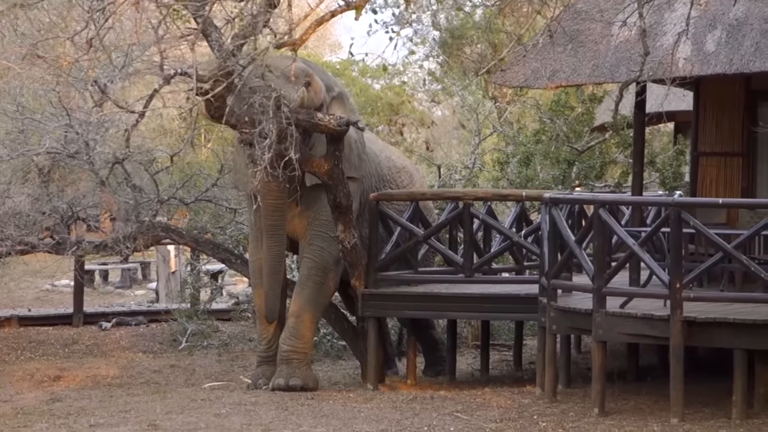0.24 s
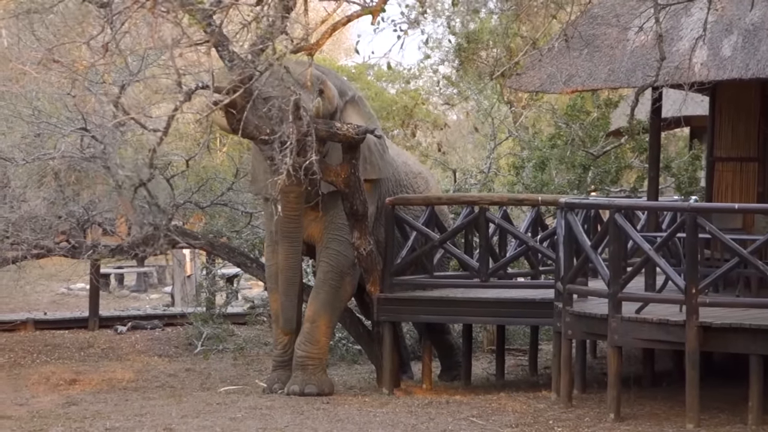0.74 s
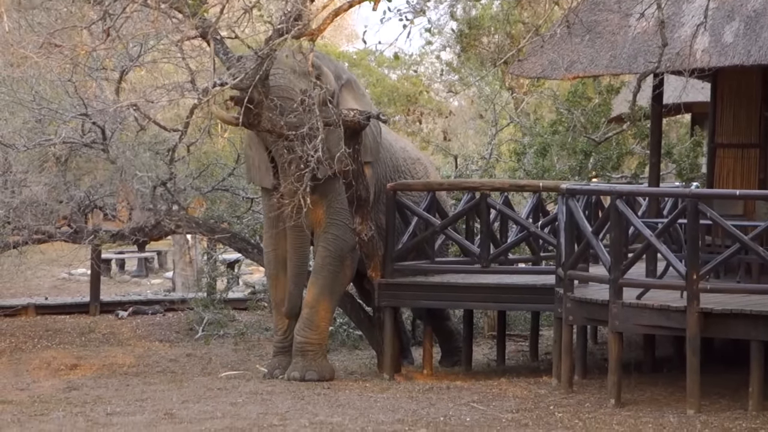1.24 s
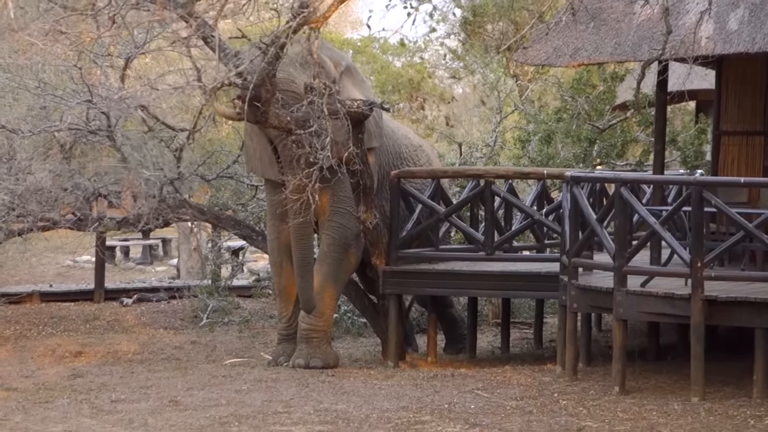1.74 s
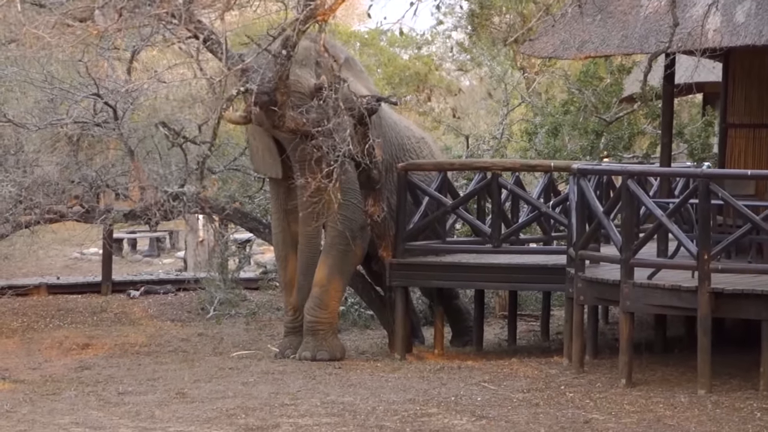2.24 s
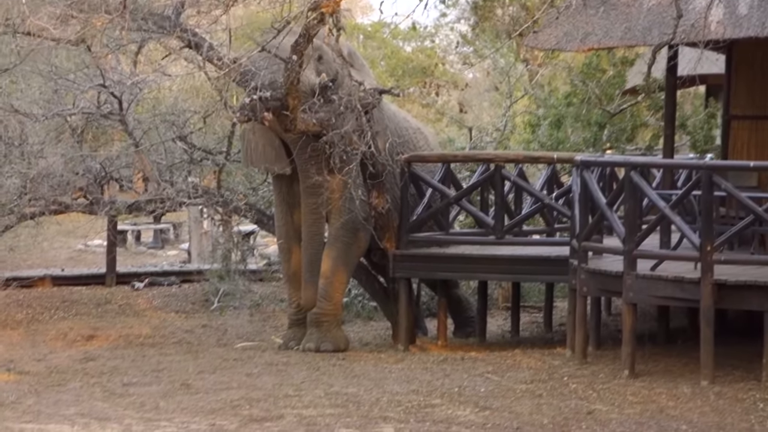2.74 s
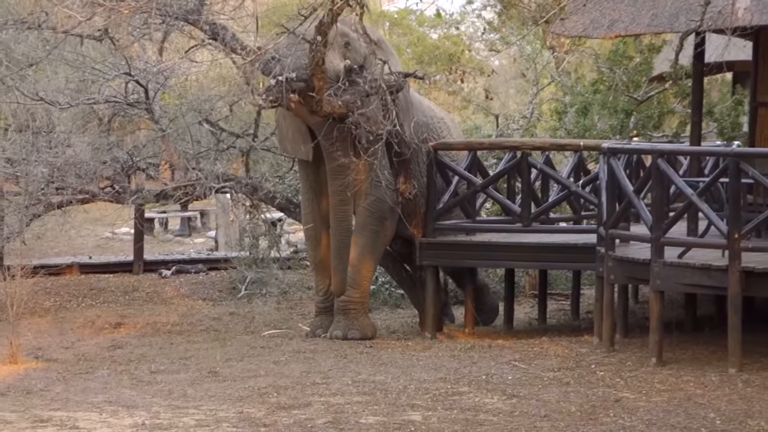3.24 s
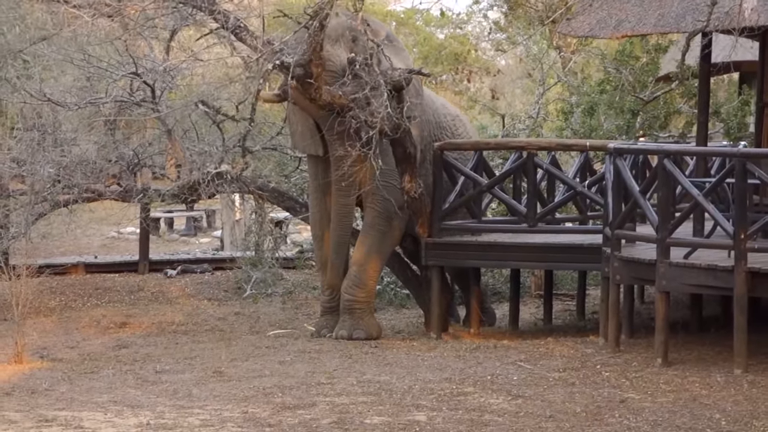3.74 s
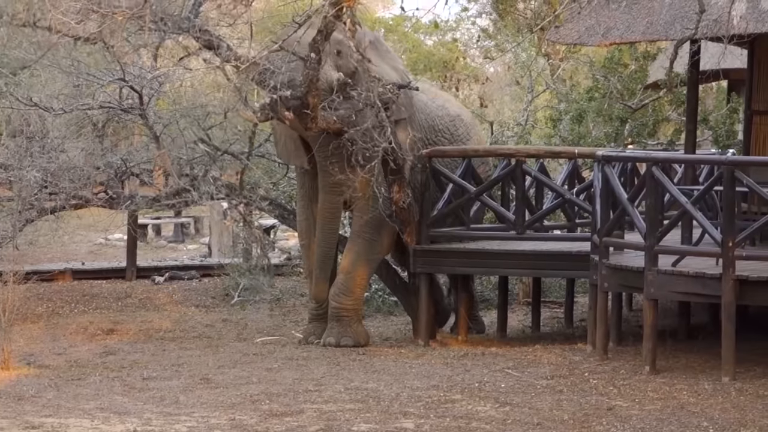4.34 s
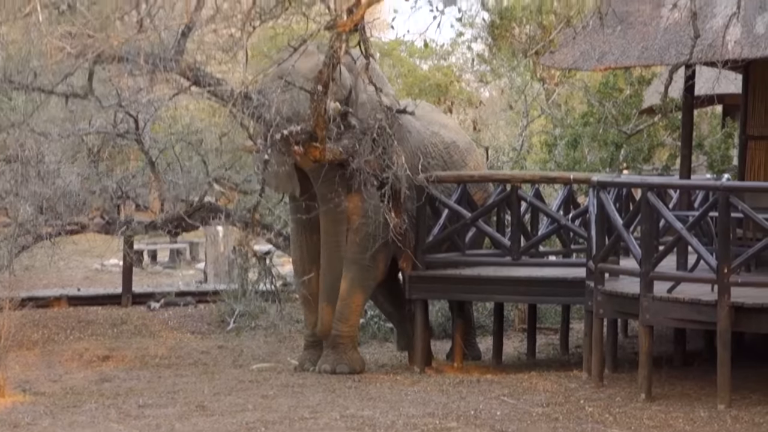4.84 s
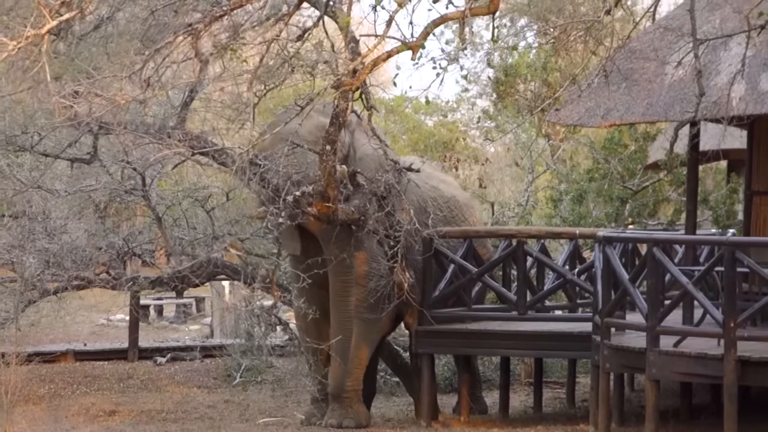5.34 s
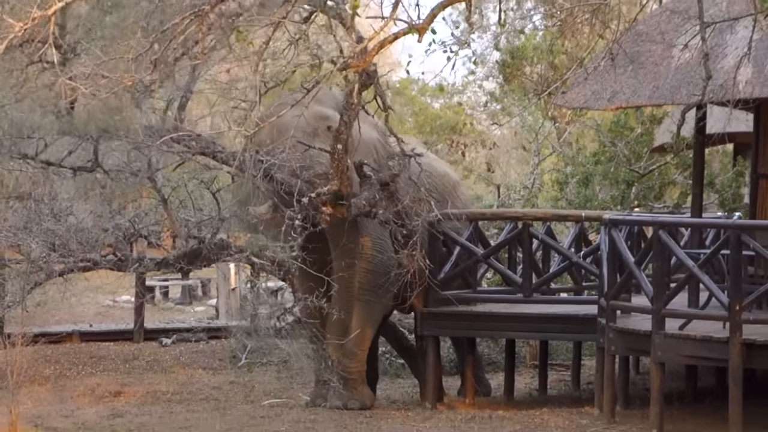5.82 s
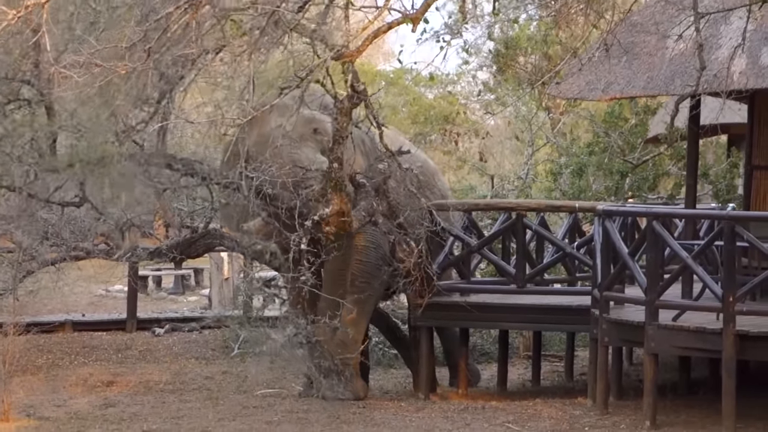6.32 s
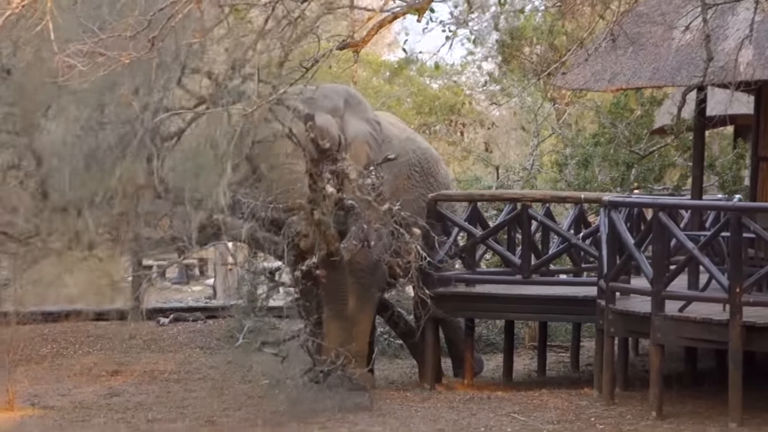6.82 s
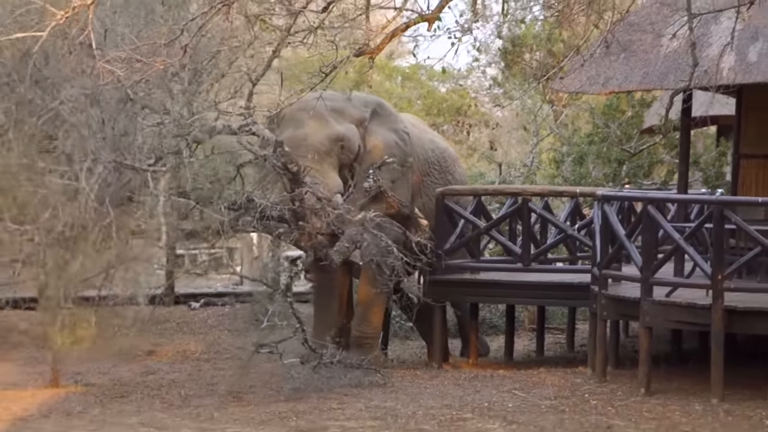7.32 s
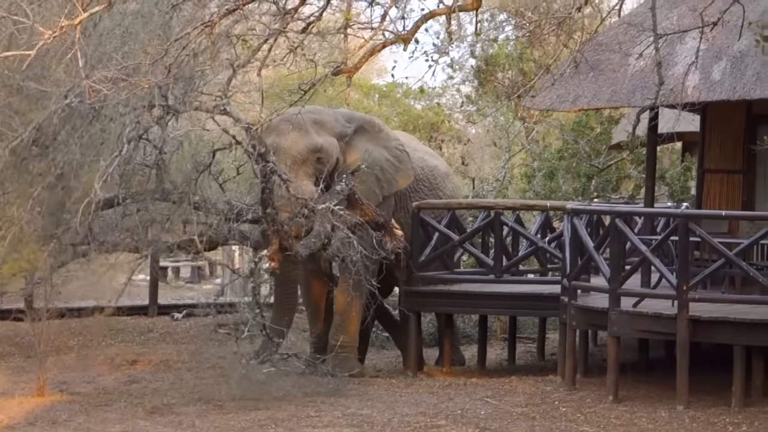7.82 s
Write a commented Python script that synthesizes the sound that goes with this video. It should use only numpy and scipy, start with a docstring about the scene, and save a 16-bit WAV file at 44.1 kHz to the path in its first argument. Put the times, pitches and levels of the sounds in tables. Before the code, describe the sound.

An elephant tears at a dry tree, branches cracking and splintering with sharp twig snaps and leafy rustling, while wind buffets the microphone.

```python
"""Open bush: an elephant pulls dry branches off a tree, heard through the two ports of a camera.
Limbs crack and splinter: ragged noise bursts, ringing wood modes and a scattered tail; twigs snap.
Twigs and leaves rustle as coloured noise and random ticks, and shiver after every crack.
Gusts buffet the ports as banded pulse trains, single eddies and hard knocks over a low breeze;
the left port lifts the treble of what comes through the air."""
import sys
import numpy as np
from scipy import signal
from scipy.fft import rfft, irfft, next_fast_len
from scipy.io import wavfile
from scipy.ndimage import uniform_filter1d

SR = 44100
rng = np.random.default_rng(int(sys.argv[2]) if len(sys.argv) > 2 else 0)


def write(x):
    x = np.atleast_2d(x).T
    wavfile.write(sys.argv[1], SR, np.round(np.clip(x, -1, 1) * 32767).astype(np.int16))

N = 356011
T = np.arange(N) / SR  # s

# Cracks of wood: t/s, level/dB, thickness/0-1, twig part against the level/dB
CRACKS = [(0.46, -45, 0.68, 10.5), (0.781, -42.5, .7, 5), (0.8122, -30, 0.84, 0), (0.8174, -19.5, 0.8, 2),
          (0.831, -30, 0.93, -5), (0.861, -25.5, 0.91, 4.5), (0.933, -15.5, 0.77, 3.5),
          (0.9622, -22, 0.5, 2), (0.973, -29.5, 0.96, 1), (1.2016, -32, 0.66, -9), (1.245, -37, 0.3, -16),
          (1.3238, -36.5, 0.57, -9), (1.374, -26.5, 0.8, 0), (1.4089, -27, 0.66, 6.5),
          (1.418, -30, 0.45, 2), (1.468, -41.5, 0.3, 13), (1.488, -34.5, 0.92, 0), (1.544, -42, 0.83, -10),
          (1.599, -36, 0.72, 5.5), (1.6388, -31, 0.81, 4.5), (1.776, -38, 0, 6), (1.84, -42, 0.04, 3),
          (1.86, -44, 0, 7), (2.0703, -35, 0.83, -21), (2.095, -25.5, 0.2, 8), (2.1057, -17.5, 0.81, -2),
          (2.259, -30, 0.26, 1), (2.2816, -17.5, 0.76, 2.5), (2.345, -40, 0.4, 15.5), (2.3669, -41, .1, 15),
          (2.447, -39, 0.34, 6.5), (2.468, -36.5, 0.55, -11), (2.5335, -29.5, 0.71, 6.5),
          (2.6276, -36, 0, 12), (2.702, -37, 0.2, 8), (2.773, -28.5, 0.14, 4.5), (2.803, -31.5, 0.45, 0),
          (2.837, -31, 0, 3.5), (2.867, -37, .2, 1), (2.898, -36, 0.46, 3), (2.9138, -28, 0.35, 0.5),
          (2.942, -17, 0.22, -0.5), (3.029, -44.5, 0.2, 13.5), (3.4824, -35, 0, 7),
          (4.645, -36.5, 0.05, 9.5), (4.693, -37, 0.55, -11), (4.707, -20.5, 0.38, 0.5),
          (4.826, -34.5, 0.67, 2), (4.8478, -21.5, 0.87, 9.5), (4.864, -21.5, 0, -2),
          (4.885, -32.5, .05, -4), (4.917, -32, 0.76, 0), (4.977, -23.5, 0.7, 5.5), (5.086, -39, 0.95, -1),
          (5.229, -29, 0.34, 3), (5.242, -34, 0.5, 5), (5.406, -15.5, 0.56, -1), (5.6147, -23.5, 0.3, 6),
          (5.64, -24.5, 0.77, -5), (5.6792, -29.5, 0.2, 4), (5.806, -20, 0.1, -2), (5.826, -20, 0.6, -3.5),
          (5.898, -27, 0.6, 6), (5.9364, -21.5, 0.53, 5.5), (6.0223, -25.5, 0.58, 3),
          (6.0605, -28.5, 0.63, 5.5), (6.1213, -24, 0.6, 6.5), (6.201, -20.5, 0.63, -4.5),
          (6.287, -21.5, 0.57, 1), (6.307, -21.5, 0.72, -3), (6.371, -30.5, 0.75, 9),
          (6.408, -31.5, 0.95, 6), (6.431, -26, 0.4, 2), (6.439, -13, 0.77, -2), (6.4502, -19, 0.4, -4),
          (6.461, -18, 0.9, -3), (6.47, -21, 0.77, -3), (6.481, -26, 0.82, -1), (6.4997, -21, 0.73, -13),
          (6.53, -24.5, 0.73, 5), (6.555, -22.5, 0.8, 0), (6.599, -12.5, 0.69, -5.5),
          (6.642, -19.5, 0.72, 2), (6.7147, -19, 0.4, -6.5), (6.732, -21, 0.86, -18),
          (6.7603, -31, 0.6, -14), (6.808, -26, 0.3, -2), (6.875, -29.5, 0.1, 5),
          (6.8982, -16.5, 0.55, 0.5), (6.911, -23, 0, -16), (7.044, -37.5, 0.84, -24),
          (7.213, -35.5, 0, -3), (7.32, -28.5, 0.15, -5), (7.5618, -32.5, 0.4, -23),
          (7.6452, -19.5, 0, -2.5), (7.667, -39, 0.95, 13)]
# Modes of the wood: f/Hz, width/Hz, level/dB
WOOD_MODES = [(403, 280, -4), (710, 105, -2.5), (901, 83, -4), (1214, 88, 4), (1648, 180, -1),
              (2360, 580, -5), (3300, 920, -7.5)]
# Colour of breaking wood, thick to thin: f/Hz, level/dB
LIMB_COLOUR = [(150, -8.5), (350, -3), (700, -3.5), (1100, -4), (2000, -24)]
BOUGH_COLOUR = [(500, -21.5), (1000, -4), (1400, -2), (2000, 3.5), (3000, -22.5)]
BRANCH_COLOUR = [(1200, -17.5), (2000, -3), (3000, 1.5), (4200, -2), (5500, -14), (9000, -36)]
TWIG_COLOUR = [(2500, -21), (4500, -4), (6500, 3), (8500, 0.5), (11000, -10), (15000, -22)]
# Limb and bough parts against the crack, dB
LIMB_THIN_DB, LIMB_THICK_DB = -34.5, 2.5
BOUGH_THIN_DB, BOUGH_THICK_DB = -13.5, 3.5
# Splinters after a loud crack; the delay sets both the least and the random part
SPLINTERS_FROM_DB, SPLINTER_DELAY_S = -30, 0.03
SPLINTER_DB, SPLINTER_SPREAD_DB, SPLINTER_FADE_DB_PER_S = -14, 4.5, 137
# Mode ringing against the break; thin wood loses the low modes
RING_DELAY_S, RING_DB, RING_SPREAD_DB = 0.003026, -12.5, 7
RING_THICK_DB_PER_OCTAVE = 8.5

# Clean snaps of a twig parting in one click: t/s, level/dB
SNAPS = [(0.8187, -20), (0.9351, -13), (1.9315, -14.5), (2.0233, -9), (2.0967, -19), (2.197, -24),
         (2.2838, -4), (2.5563, -10), (2.601, -17), (2.747, -23), (2.9469, -8), (4.8098, -14.5),
         (4.8688, -3.5), (4.9808, -7), (5.2438, -11), (5.6173, -2.5), (6.2028, -5.5), (6.274, -26),
         (6.3355, -12), (6.3733, -14), (6.4912, -6), (6.5024, -11), (6.5805, -18), (6.639, -16),
         (6.846, -13.5), (7.07, -16), (7.115, -15), (3.52, -23), (7.9188, -19), (7.9585, -16.5)]
# Colour of a snap: f/Hz, level/dB
SNAP_COLOUR = [(1200, -22), (3000, 3.5), (6000, 2), (10000, 2), (15000, -18)]
SNAP_ECHO_DB, SNAP_ECHO_T60_S = -3.5, 0.063

# Steady rustle of the dragged branch: t/s, twig level/dB, leaf level/dB
RUSTLE = [(0, -45.5, -41), (0.25, -57, -48.5), (0.7, -58.5, -49.5), (1.1, -59, -45), (1.44, -48, -46.5),
          (1.9, -53, -46), (2.06, -52, -44), (2.4, -48, -43.5), (2.7, -50.5, -41.5), (3.16, -59, -49),
          (3.4, -64, -57.5), (3.55, -58, -49), (4.05, -66.5, -54), (4.35, -60, -50), (4.65, -52, -40.5),
          (5.33, -53.5, -46), (5.9, -52.5, -48), (6.24, -47.5, -42.5), (6.47, -29, -36.5),
          (7.07, -43.5, -35.5), (7.4, -52, -41.5), (7.7, -49.5, -37), (8.07, -50.5, -41)]
# Colour of rubbing twigs and of leaves: f/Hz, level/dB
TWIG_RUB_COLOUR = [(300, -32), (600, -6.5), (1200, -12), (2000, -2.5), (3200, 2), (4800, 1.5), (9000, -8.5)]
LEAF_COLOUR = [(2500, -14), (4800, -12), (6500, -1), (8500, -1), (11000, -7), (15000, -20.5)]
LOUDEST_TICK_DB = 14.0  # above the faintest tick
# Shiver of the crown after each crack
SHAKE_TWIGS_DB, SHAKE_LEAVES_DB, SHAKE_RISE_S, SHAKE_T60_S = -26.5, -26.5, 0.04, 1

# Gusts on the ports: start of hold t/s, hold/s, level/dB
GUSTS = [(0, 0.0013, -21), (0.072, 0.025, -41), (0.296, 0.03, -43), (0.497, 0.07, -39), (0.59, 0.065, -40),
         (0.911, 0.033, -29), (1.967, 0.21, -36), (2.184, 0.43, -47), (2.577, 0.012, -36.5),
         (2.936, 0.0073, -34), (3.198, 0.067, -31.5), (3.377, 0.067, -27), (3.487, 0.086, -32),
         (3.741, 0.078, -29), (3.861, 0.044, -26), (3.99, 0.1, -31.5), (4.11, 0.14, -28),
         (4.269, 0.11, -38.5), (4.56, 0.07, -29), (4.678, 0.16, -28.5), (4.85, 0.17, -34),
         (5.045, 0.07, -26), (5.165, 0.056, -29.5), (5.218, 0.238, -22.5), (5.476, 0.871, -23),
         (6.368, 0.24, -27.5), (6.672, 0.29, -24.5), (6.974, 0.412, -26.5), (7.428, 0.285, -26.5),
         (7.736, 0.146, -26), (7.896, 0.11, -33), (8.037, .05, -28)]
CALM_DB, GUST_RISE_DB_PER_S, GUST_FALL_DB_PER_S = -56, 800, 426
# Eddies by band: centre f/Hz, level/dB
EDDIES = [(28, -28), (45, -35), (70, -6.5), (110, 0.5), (170, 1), (260, -1), (400, -7.5), (600, -33.5),
          (900, -50)]
# Strongest single eddies: t/s, level/dB, f/Hz
BUFFETS = [(3.243, -16.5, 95), (3.379, -9, 140), (3.743, -10.5, 137), (3.796, -16.5, 200),
           (3.865, -10, 160), (3.995, -20.5, 133), (4.075, -18, 160), (4.127, -12, 103), (4.167, -16, 94),
           (4.231, -14, 140), (4.67, -11.5, 98), (4.748, -9, 218), (4.793, -14, 230), (5.065, -13, 107),
           (5.119, -12.5, 290), (7.914, -16.5, 91)]
# Hard-edged knocks of wind: t/s, level/dB
KNOCKS = [(4.755, -18), (2.024, -19), (2.046, -27), (3.384, -22), (3.414, -23), (3.54, -22), (3.896, -19),
          (5.073, -3.5), (5.109, -7), (5.12, -9), (5.138, -8.5), (5.33, -18), (5.395, -9), (5.465, -21),
          (5.577, -24), (5.877, -7), (5.997, -9), (6.581, -16)]
KNOCK_S = 0.00035  # time constant
STRAY_KNOCKS_PER_S, STRAY_KNOCK_DB = 55, -8  # rate; faintest level against the gust
# Low rumble of the breeze: f/Hz, level/dB
BREEZE_COLOUR = [(20, -18), (40, -7), (70, 4.5), (120, 0.5), (200, -6), (400, -10.5), (800, -43)]
BREEZE_DB = -52

# Port imbalance: f/Hz, left minus right/dB
PORTS = [(2400, 1.5), (4400, 1.5), (5500, 10.5), (6500, 16), (8000, 10), (9500, 7.5), (11000, 1),
         (15000, 0)]
# Port phase: f/Hz, lead of the left/rad
PORT_PHASE = [(5400, 0.0089), (7500, -0.63), (10300, -1.04), (12000, 0.096)]
TOP_HZ = 15750


def cracks():
    """Breaking wood: thick wood sounds low and long, twigs high and short."""
    breaks = splintered()
    _, _, thick, twig_db = breaks.T
    limb_db = LIMB_THIN_DB + (LIMB_THICK_DB - LIMB_THIN_DB) * thick
    bough_db = BOUGH_THIN_DB + (BOUGH_THICK_DB - BOUGH_THIN_DB) * thick
    branch_db = np.zeros(len(breaks))
    limb = tearing(breaks, limb_db, 0.061, -5.5, 0.48) * pair(0.95)
    bough = tearing(breaks, bough_db, 0.026, -7.5, 0.43) * pair(0.9)
    branch = tearing(breaks, branch_db, 0.035, -8.0, 0.24) * pair(1.0)
    twig = tearing(breaks, twig_db, 0.018, -3.5, 0.18) * pair(0.65)
    limb = colour(limb, flat(LIMB_COLOUR) + wood_db())
    bough = colour(bough, flat(BOUGH_COLOUR) + wood_db())
    branch = colour(branch, flat(BRANCH_COLOUR) + wood_db())
    twig = colour(twig, flat(TWIG_COLOUR))
    return undb(2.0) * limb + undb(2.5) * bough + undb(3.0) * branch + undb(3.5) * twig + rings(breaks)


def splintered(count=5):
    """All breaks: the cracks and, after each loud one, weaker splinters of the same wood."""
    rows = np.array(CRACKS, float)
    delay = rng.exponential(size=(len(rows), count))
    weaker, twig_scatter = rng.standard_normal((2, len(rows), count))
    fade_db = SPLINTER_FADE_DB_PER_S * SPLINTER_DELAY_S * delay
    splinters = np.repeat(rows[:, None], count, axis=1)
    splinters[..., 0] += SPLINTER_DELAY_S * (0.214 + delay)
    splinters[..., 1] += SPLINTER_DB - SPLINTER_SPREAD_DB * np.abs(weaker) - fade_db
    splinters[..., 3] += SPLINTER_SPREAD_DB * twig_scatter
    loud = rows[:, 1] > SPLINTERS_FROM_DB
    return np.vstack([rows, splinters[loud].reshape(-1, rows.shape[1])])


def tearing(breaks, share_db, t60_s, tail_db, tail_t60_s):
    """Envelope for one size of wood: fibres part raggedly, trunks and ground scatter back a tail."""
    env, t = np.zeros(N), T[:SR // 12]
    for (s, db, *_), extra_db in zip(breaks, share_db):
        i = int(s * SR)
        lasts_s = t60_s * undb(0.02 * (db - 2.0))  # a louder break tears for longer
        rise_s = 0.0016 * undb(0.32 * (db + 24.5))  # and takes longer to let go
        burst = undb(db + extra_db - 60 * t / lasts_s) * np.minimum(t / rise_s, 1)
        env[i:i + len(t)] += burst[:N - i]
    t = T[:SR // 2]
    fade = undb(-120 * t / tail_t60_s) * np.minimum(t / 0.0011, 1)  # power
    tail_power = np.abs(signal.fftconvolve(env ** 2, fade / np.sum(fade))[:N])
    ragged = undb(4.36 * walk(700))
    patchy = undb(2.0 * walk(150))  # echoes arrive in clumps
    return np.sqrt((env * ragged) ** 2 + tail_power * (undb(tail_db) * patchy) ** 2)


def wood_db():
    """Resonances of the wood over an even base, dB per frequency bin."""
    hz = np.linspace(1, SR / 2, 2049)
    power = undb(-23.5)  # base; undb halves the dB of a power
    for f, width, db in WOOD_MODES:
        power = power + undb(2 * db) / (1 + (2 * (hz - f) / width) ** 2)
    return 10 * np.log10(power / np.mean(power[40:400]))  # about 0.43-4.3 kHz


def rings(breaks):
    """Each break strikes the modes unevenly; thick wood favours the low ones."""
    s, db, thick, _ = breaks.T
    chance = rng.standard_normal((len(breaks), len(WOOD_MODES)))
    out = np.zeros(N)
    for (hz, width_hz, mode_db), luck in zip(WOOD_MODES, chance.T):
        octaves_below = max(np.log2(2400 / hz), 0)
        thin_loss_db = RING_THICK_DB_PER_OCTAVE * (thick - 1) * octaves_below
        blow_db = db + mode_db + RING_DB + RING_SPREAD_DB * luck + thin_loss_db
        out += ring(spikes(np.transpose([s + RING_DELAY_S, blow_db])), hz, width_hz)
    return out


def ring(blows, hz, width_hz):
    """One mode: each blow starts a fading sine of its own size."""
    r, w = np.exp(-np.pi * width_hz / SR), 2 * np.pi * hz / SR
    return signal.lfilter([np.sin(w)], [1, -2 * r * np.cos(w), r * r], blows)


def snaps():
    """A twig parts in a bright click, briefly smeared by the branches around."""
    t = T[:SR // 20]
    echo = pair(0.62)[:, :len(t)] * undb(-60 * t / SNAP_ECHO_T60_S)
    echo *= undb(SNAP_ECHO_DB) / np.sqrt(np.sum(echo[0] ** 2))
    click = colour(echo + (t == 0), flat(SNAP_COLOUR))
    return signal.fftconvolve(spikes(SNAPS)[None], click / np.abs(click).max(), axes=-1)[:, :N]


def rustle():
    """Twigs tick and rub, dry leaves hiss and crackle; the harder the pull, the denser the ticks."""
    s, twig_db, leaf_db = np.transpose(RUSTLE)
    pull_db = shaken(np.interp(T, s, twig_db), SHAKE_TWIGS_DB)
    leaf_db = shaken(np.interp(T, s, leaf_db), SHAKE_LEAVES_DB)
    rate = 70 * undb(0.16 * (pull_db + 42.0))
    both, low, high = (tick_swell(rate) for _ in range(3))

    rub = (0.88 + 0.16 * both + 0.2 * low) * undb(0.84 * walk(23)) * pair(0.99)
    twigs = rub + 7.0 * clicks(rate, 2.9, LOUDEST_TICK_DB)
    hiss = (0.79 + 0.31 * both + 0.33 * high) * undb(2.4 * walk(25)) * pair(0.56)
    leaves = hiss + 7.9 * clicks(rate, 3.8, LOUDEST_TICK_DB)
    taps = np.zeros(N)
    for hz, width_hz, db in WOOD_MODES[1:]:  # a tap wakes a single mode
        taps += undb(db) * ring(clicks(0.3 * rate, 3.5, LOUDEST_TICK_DB), hz, width_hz)

    twigs = unit(colour(twigs, flat(TWIG_RUB_COLOUR) + wood_db())) + 0.28 * unit(taps)
    return undb(pull_db) * twigs + undb(leaf_db) * unit(colour(leaves, flat(LEAF_COLOUR)))


def tick_swell(rate):
    """Envelope that jumps at random ticks and decays with a T60 of 37 ms."""
    ticks = np.abs(clicks(rate, 3.0, LOUDEST_TICK_DB))
    return unit(signal.lfilter([1], [1, -undb(-60 / SR / 0.037)], ticks))


def shaken(steady_db, shake_db):
    """Rustle level in dB: the steady drag plus a shiver that rises and dies after every crack."""
    s, db, _, _ = np.transpose(CRACKS)
    jolts, t = np.zeros(N), T[:SR]
    jolts[(s * SR).astype(int)] = undb(2 * (db + shake_db))  # power
    shiver = undb(-2 * 60 * t / SHAKE_T60_S) * np.minimum(t / SHAKE_RISE_S, 1)
    return 10 * np.log10(undb(2 * steady_db) + np.abs(signal.fftconvolve(jolts, shiver)[:N]))


def wind(lag_s=0.00047):
    """Eddies, buffets and knocks strike the left port, then the right, over the breeze."""
    gust_db = gusts()
    out = eddies(gust_db) + buffets() + knocks(gust_db)
    out[1] = np.interp(T - lag_s, T, out[1])
    return out + breeze()


def gusts():
    """Wind level in dB: every gust rises fast, holds and falls back to the calm."""
    level_db = np.full(N, float(CALM_DB))
    for s, hold_s, db in GUSTS:
        slope_db = np.minimum(GUST_RISE_DB_PER_S * (T - s), GUST_FALL_DB_PER_S * (s + hold_s - T))
        level_db = np.maximum(level_db, db + np.minimum(slope_db, 0))
    return level_db


def eddies(gust_db):
    """Random pulses, band by band, thud on the ports; small eddies differ between the two."""
    # light wind comes in lumps, a gust roars on
    bursts = undb(np.clip(-0.3 * (gust_db + 21.5), 0, 6) * walk(35))
    thuds = clicks(110, 3.5, 12.0)
    out = np.zeros((2, N))
    for hz, size_db in EDDIES:
        sos = signal.butter(2, [hz / 1.187, hz * 1.274], "band", fs=SR, output="sos")
        octave = np.log2(hz / 119.0)
        above = max(octave, 0)
        sharp = thuds * np.abs(thuds + 1e-9) ** (0.3 * above)  # hard thuds reach higher
        common = unit(signal.sosfilt(sos, bursts * sharp))
        fine, own = (unit(signal.sosfilt(sos, bursts * clicks(1.2 * hz, 3.84, 13.3))) for _ in range(2))
        shared = unit((0.5 + 0.36 * above) * common + 1.2 * fine)
        apart = np.clip(0.25 + hz / 3200.0, 0, 1)
        right = undb(2.2 * max(octave + 0.097, 0)) * (np.sqrt(1 - apart ** 2) * shared + apart * own)
        # strong gusts shed more small eddies
        level_db = size_db + gust_db + 0.54 * octave * (gust_db + 24.0)
        out += np.array([shared, right]) * undb(level_db)
    return undb(-1.5) * out


def buffets():
    """Strong single eddies: 1.6 windowed cycles each, with overtones from a steep front."""
    out = np.zeros(N)
    for s, db, hz in BUFFETS:
        i, t = int(s * SR), T[:int(1.6 * SR / hz)]
        phase = 2 * np.pi * hz * t
        swing = np.sin(phase + 0.9 * np.sin(phase))
        out[i:i + len(t)] += undb(db) * np.sin(np.pi * t / t[-1]) ** 2 * swing
    return out


def knocks(gust_db):
    """A sudden push on the membrane that swings back once; gusts scatter stray ones."""
    t = T[:SR // 50] / KNOCK_S
    push = 2 * t ** 2 * (1 - t / 5) * np.exp(-t)
    stray = clicks(STRAY_KNOCKS_PER_S, 4.5, 16.0) * undb(gust_db + STRAY_KNOCK_DB)
    return np.convolve(spikes(KNOCKS) + stray, push)[:N]


def breeze():
    """Low coloured noise whose level drifts slowly."""
    drift_db = 4.0 * walk(6)
    return undb(BREEZE_DB + drift_db) * unit(colour(pair(0.77), spectrum_db(BREEZE_COLOUR)))


def undb(db):
    """Gain of a level in dB."""
    return 10 ** (np.asarray(db) / 20)


def unit(x):
    """Scaled to rms 1."""
    return x / np.sqrt(np.mean(x ** 2))


def spectrum_db(table):
    """A (f/Hz, level/dB) table interpolated over log frequency on a fine linear grid."""
    hz, db = np.transpose(table)
    return np.interp(np.log(np.linspace(1, SR / 2, 2049)), np.log(hz), db)


def flat(table):
    """Spectrum in dB with unit mean power, so white noise keeps its level."""
    db = spectrum_db(table)
    return db - 10 * np.log10(np.mean(undb(2 * db)))


def colour(x, db):
    """Causal filter with these gains: the response comes from the folded cepstrum."""
    cep = irfft(np.log(undb(db)))
    cep[1:2048] *= 2
    cep[2049:] = 0
    response = irfft(np.exp(rfft(cep)))
    return signal.fftconvolve(x, np.atleast_2d(response), axes=-1)[:, :N]


def walk(rate):
    """Random levels held 1 / rate s and slewed twice."""
    k = int(SR / rate)
    held = np.repeat(rng.standard_normal(N // k + 1), k)
    return uniform_filter1d(uniform_filter1d(held, k), k)[:N]


def clicks(rate, spread_db, most_db):
    """Random clicks of both signs, many small, few large; the rate per second may vary in time."""
    size, when = rng.exponential(size=N), 2 * rng.random(N) - 1
    return np.sign(when) * undb(np.minimum(spread_db * size, most_db)) * (np.abs(when) < rate / SR)


def pair(likeness):
    """Left and right noise that share a part."""
    mid, side = rng.standard_normal((2, N))
    c = np.clip(likeness, 0, 1)
    return (np.sqrt(1 + c) * mid + np.sqrt(1 - c) * side * np.array([[1], [-1]])) / np.sqrt(2)


def spikes(table):
    """One sample for every (t/s, level/dB) row."""
    s, db = np.transpose(table)
    out = np.zeros(N)
    out[(s * SR).astype(int)] = undb(db)
    return out


def through_ports(air):
    """Level and phase differ between the ports with frequency."""
    size = next_fast_len(N)
    hz = np.arange(size // 2 + 1) * SR / size
    ports_db = np.interp(hz, *np.transpose([(200, 0.0059)] + list(PORTS)))
    lead = np.exp(1j * np.interp(hz, *np.transpose([(0, 0)] + list(PORT_PHASE))))
    left_share = 0.25  # of the imbalance is a lift on the left, the rest shading on the right
    ports = np.array([undb(left_share * ports_db) * lead, undb((left_share - 1) * ports_db)])
    return irfft(rfft(air, size) * ports, size)[:, :N]


def scene():
    """Wood and leaves reach the ports through the air; the wind strikes them directly."""
    return through_ports(cracks() + snaps() + rustle()) + wind()


def record(dry):
    """The camera adds faint hiss, rounds the loudest peaks and cuts the top steeply."""
    dry = dry + undb(-60.5) * rng.standard_normal(dry.shape)
    rounded = np.tanh(1.185 * dry) / 1.493
    return signal.sosfilt(signal.ellip(12, 0.2, 100, TOP_HZ, fs=SR, output="sos"), rounded)


dry = scene()
out = record(dry)
write(out)
```